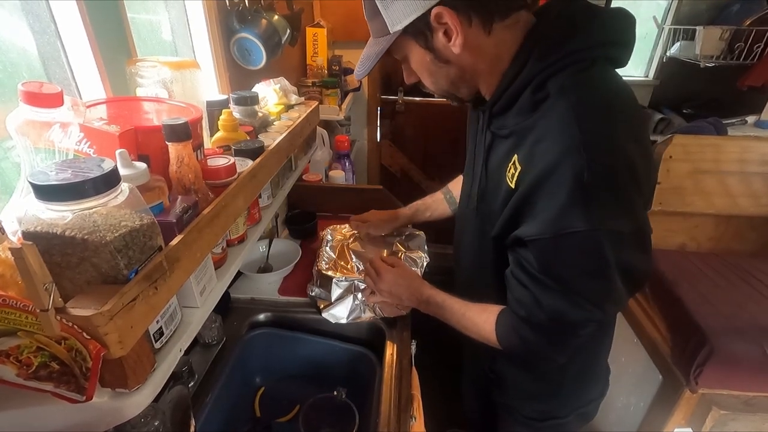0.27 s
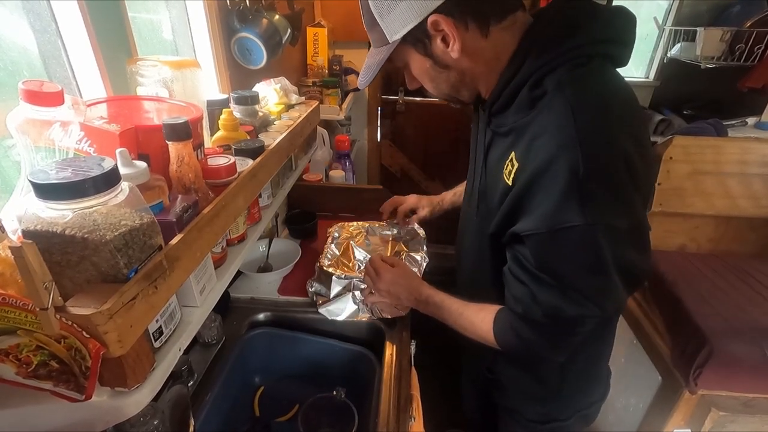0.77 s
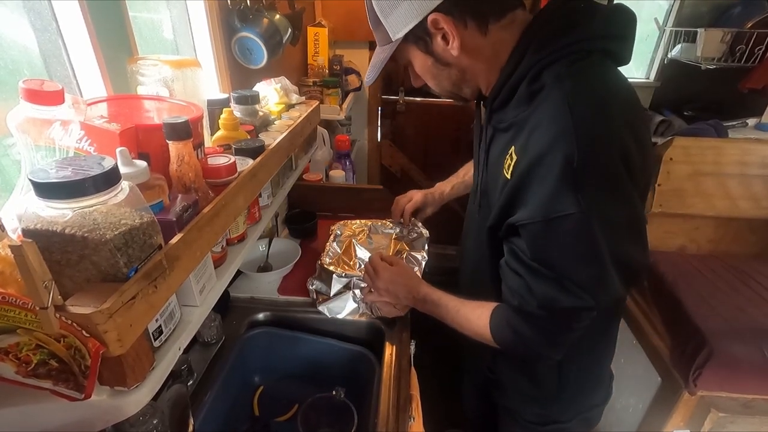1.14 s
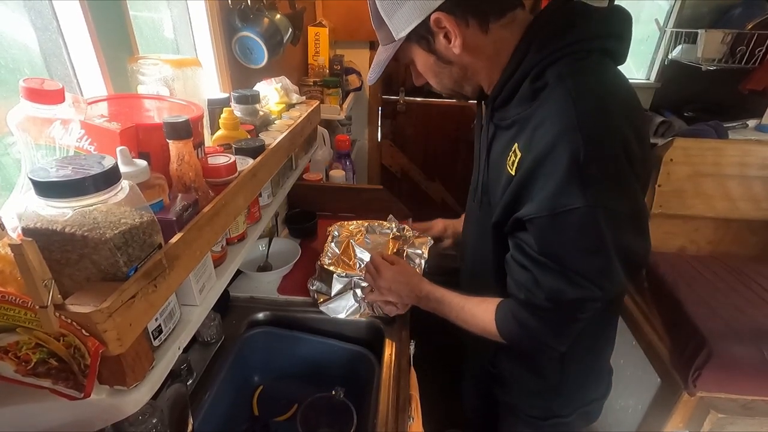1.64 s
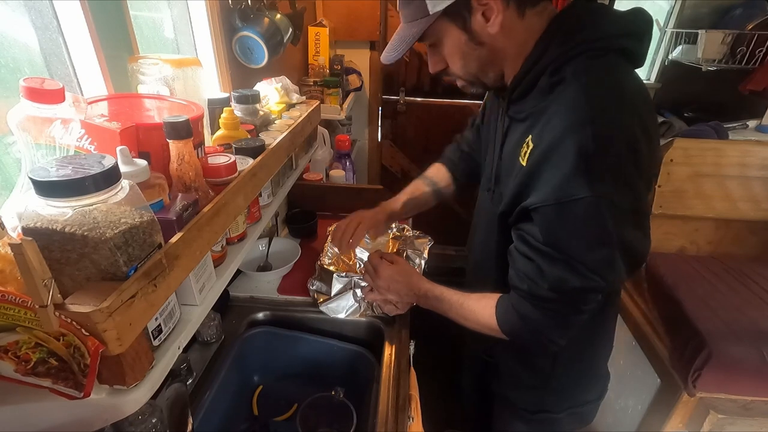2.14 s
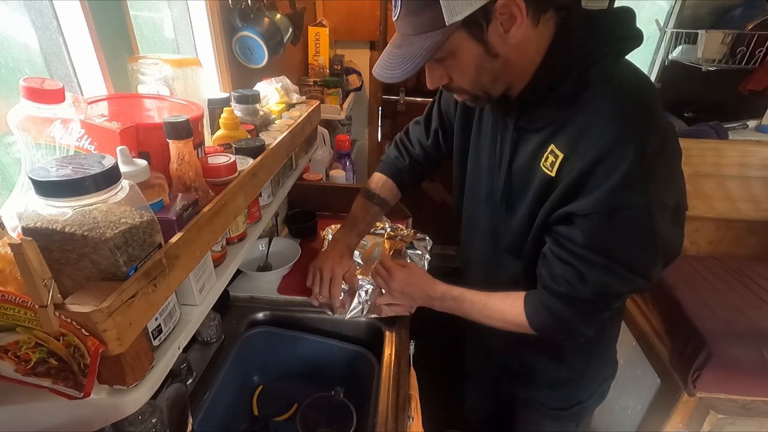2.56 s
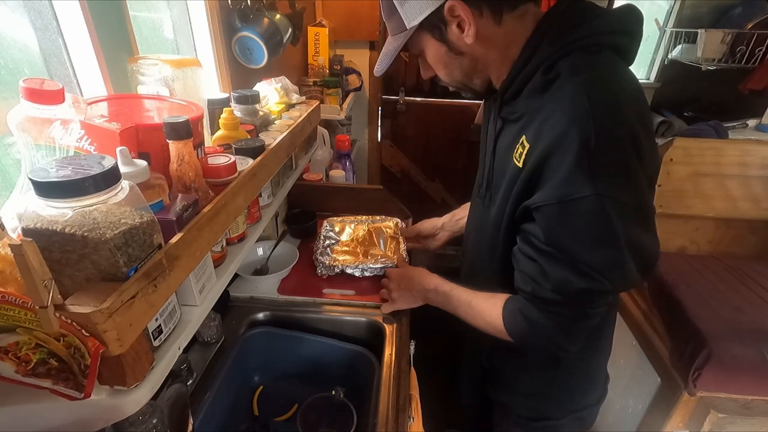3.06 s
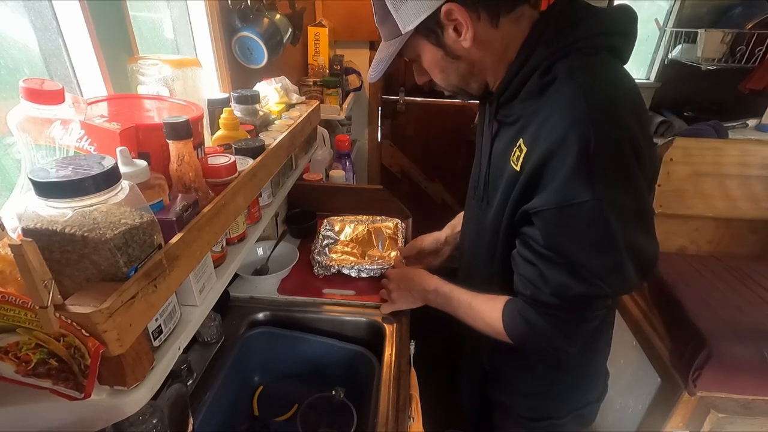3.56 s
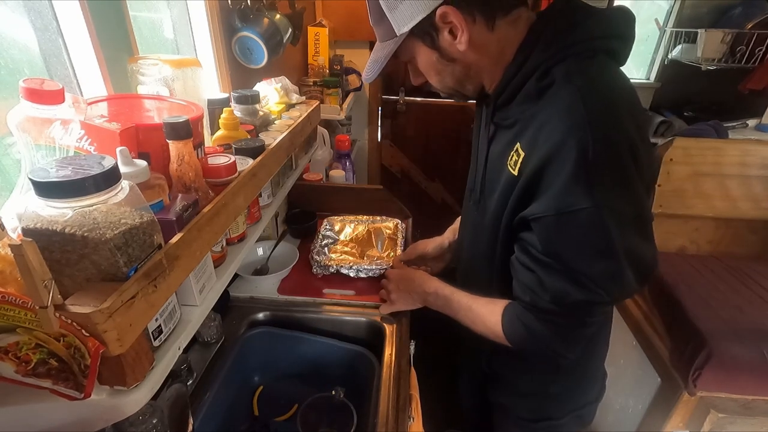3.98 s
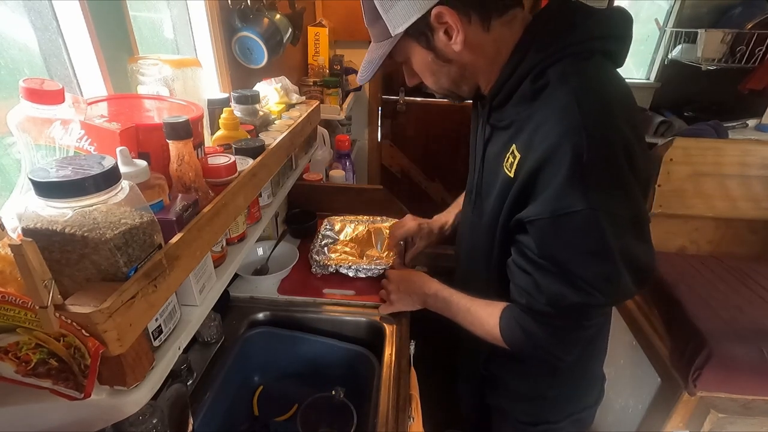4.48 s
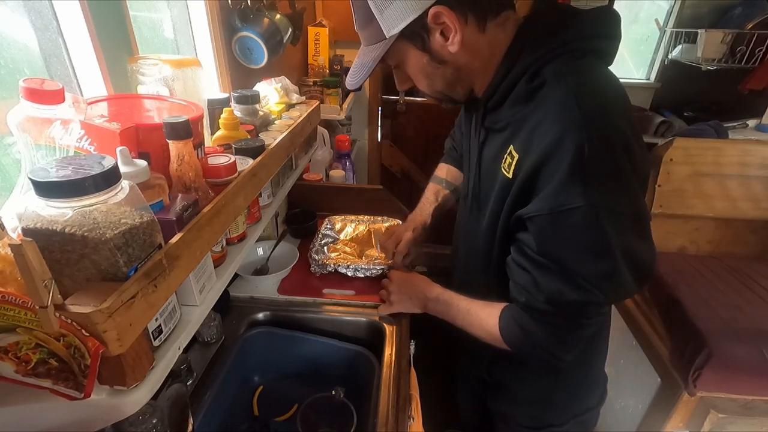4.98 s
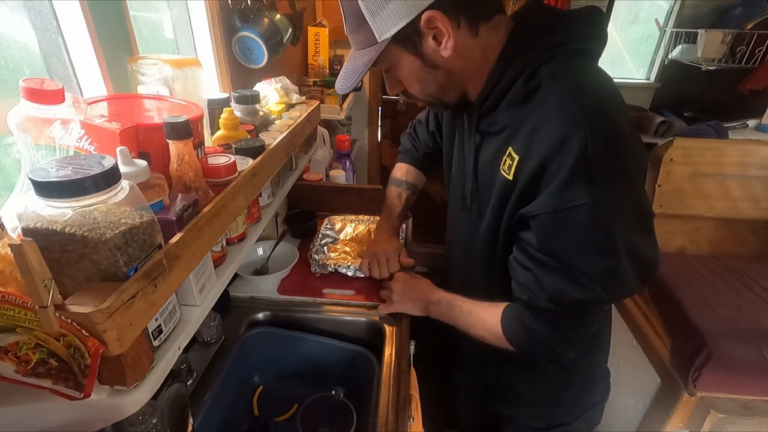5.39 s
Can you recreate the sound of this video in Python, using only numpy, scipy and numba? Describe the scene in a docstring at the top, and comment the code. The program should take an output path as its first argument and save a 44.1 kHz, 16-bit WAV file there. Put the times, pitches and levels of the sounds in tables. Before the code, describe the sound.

Hands press aluminium foil over a baking pan in a small kitchen, heard close up in stereo. Dense bright crackles and sharp snaps run for two seconds, with a dull pan knock near one second. A near-silent pause follows, then a strong burst of crumpling, thinning to delicate crinkles and isolated ticks. A short tail from close walls, faint low rumble and steady room hum sit beneath.

```python
"""Aluminium foil is pressed over a baking pan and crimped round its rim, an arm's length from the microphone.
Creases snap as damped sines, singly and in dense swarms, with a short noise-like shimmer of the sheet after them.
The pan's rim rings in a few dull modes as it knocks on the worktop, and rubbing stirs filtered noise in both.
The place is a small kitchen: close shelves and walls return a short tail, and under it all lie a low
wandering rumble and a faint steady room hum, both of filtered noise."""
import sys
import numpy as np
from scipy import signal
from scipy.fft import rfft, irfft, next_fast_len
from scipy.io import wavfile
from numba import njit

SR = 44100
rng = np.random.default_rng(int(sys.argv[2]) if len(sys.argv) > 2 else 0)


def unload_wav(signal):
    """Save mono or channel-first audio to the path in sys.argv[1] as 16-bit WAV at rate SR, clipped to [-1, 1]."""
    wavfile.write(
        sys.argv[1],
        SR,
        np.round(np.clip(np.atleast_2d(signal).T, -1, 1) * 32767).astype(np.int16),
    )


N = 248283
TIME = np.arange(N) / SR  # seconds

# a hand presses the sheet down on the pan: (start [s], length [s], crackle level [dB],
# wide panels over crackle [dB], fine creases over crackle [dB], worktop level [dB], pan level [dB])
PRESSES = [(0, 0.01, -33.5, 0.5, -2, -41.5, -40), (0.092, 0.093, -42.5, 3.5, -5, -54.5, -52.5),
           (0.239, 0.092, -41.5, 4.5, -7, -46.5, -49), (0.326, 0.074, -37, 1, -7, -46.5, -43.5),
           (0.404, 0.13, -47, 2.5, -3.5, -54.5, -55), (0.588, 0.15, -44.5, 5.5, -9, -55, -47),
           (0.691, 0.082, -33.5, -2, -7, -45.5, -39.5), (0.856, 0.09, -41, 5.5, -5, -42.5, -44),
           (0.977, 0.035, -37.5, 3, -11, -33, -30), (1.024, 0.05, -41.5, 0, -2.5, -41, -52),
           (1.1, 0.054, -54.5, 4, -11, -53, -62), (1.131, .04, -41, 0, -11, -60, -48),
           (1.22, 0.2, -56, 4, -5, -63, -58), (1.35, 0.077, -38, 3.5, -4.5, -47.5, -51),
           (1.401, 0.059, -36, 0.5, -0.5, -47, -41), (1.508, 0.11, -41.5, 1.5, -4, -46, -44.5),
           (1.608, 0.035, -39.5, 4, -3, -34, -41.5), (1.66, 0.048, -37.5, 3, -8.5, -39, -45.5),
           (1.73, 0.085, -43, 2.5, -6, -56, -52), (1.868, 0.042, -43, 6.5, -8, -45.5, -44.5),
           (1.954, 0.084, -57, 5, -7, -59, -63), (2.052, 0.035, -68.5, 13, -13, -63, -74),
           (2.13, 0.12, -67, 9, -1.5, -70, -79.5), (2.272, 0.094, -76.5, 10, 0.5, -75.5, -76),
           (2.352, 0.11, -61.5, 2, -7, -74, -75), (2.481, .05, -33, 4, -1.5, -36, -49),
           (2.524, 0.049, -32, 0, -2, -37.5, -46.5), (2.596, 0.13, -44, 8, -3.5, -43, -43),
           (2.743, 0.11, -38.5, 7, -2, -44.5, -42), (2.914, 0.11, -56, 7, -11, -67, -60.5),
           (3.02, 0.012, -66, 3, -7, -58, -58), (3.101, 0.18, -50, 0, -8, -67, -59.5),
           (3.272, 0.048, -45, 1.5, -9, -68, -58), (3.373, 0.045, -47, 5, -15, -52.5, -57.5),
           (3.522, 0.08, -54, 1.5, -5, -60, -65), (3.608, 0.087, -43.5, -0.5, -11, -72, -54.5),
           (3.731, 0.12, -56.5, 3, -4.5, -62, -69), (3.919, 0.11, -59, 3, -7, -62, -66),
           (4.025, 0.084, -58.5, 1, -12, -60, -71), (4.176, .06, -56.5, -2, -4, -66, -76),
           (4.265, 0.034, -63, -1, -6, -58, -74), (4.31, 0.05, -56, -5, -2.5, -65, -74),
           (4.37, 0.13, -47, -0.5, -5, -60.5, -65), (4.495, 0.041, -46, 5, -4.5, -58, -57.5),
           (4.598, 0.02, -56, 1.5, -2, -70, -71), (4.719, 0.057, -55.5, 8.5, -5.5, -56, -63.5),
           (4.824, 0.22, -57, 5, -8.5, -60.5, -64), (5.056, 0.077, -47, 0, -6, -54.5, -63),
           (5.156, 0.091, -60, 10, -7, -62, -60.5), (5.332, .13, -60, 4, -1, -64.5, -79),
           (5.47, .12, -50, 3.5, -8.5, -53.5, -56.5)]
# a fold gives way and the sheet shimmers: (time [s], nominal peak [dB], tint pitch [Hz],
# wide panels over creases [dB], fine creases over creases [dB], t60 [s])
FOLDS = [(0.0987, -14, 1577, -1.5, -7, 0.1), (0.1555, -30.5, 1750, 0, -12, 0.18),
         (0.2466, -21, 1740, 0, 3, 0.09), (0.2596, -22, 1800, -8.5, -8, 0.076),
         (0.2723, -19.5, 1740, -3, 8.5, 0.083), (0.3366, -19, 3000, -13, -10, 0.12),
         (0.3701, -14.5, 1030, 0, -7, 0.16), (0.4319, -26.5, 1900, 8, -12, 0.17),
         (0.4794, -18.5, 3300, -1, -5, 0.069), (0.5042, -21, 2810, -7, 1, 0.035),
         (0.574, -20.5, 1610, -1.5, -5.5, 0.19), (0.595, -31, 4640, -20, 7, 0.073),
         (0.6488, -26, 1510, 9, 6.5, 0.14), (0.6666, -23, 1115, 0, 8.5, 0.095),
         (0.7043, -34, 3060, 0, -14, 0.064), (0.835, -26.5, 927, 2, -11, 0.18),
         (0.8505, -27.5, 2680, 2, -6, 0.15), (0.8782, -14.5, 1736, -3.5, -6.5, 0.2),
         (0.8974, -15, 3280, -5, 1.5, 0.1), (0.9173, -7.5, 1050, -3, -2.5, 0.055),
         (0.9667, -13.5, 2700, 4, -6, 0.043), (0.9892, -16.5, 1036, 1, -2.5, 0.19),
         (1.0445, -22, 1050, 2, -8, 0.16), (1.1463, -16, 4330, -4, -3.5, 0.11),
         (1.217, -26, 4950, -3, -9, 0.12), (1.2475, -18.5, 4100, -2, -21, 0.12),
         (1.3259, -30.5, 1240, 2, -14, 0.16), (1.3603, -30, 1410, 9, -18, 0.063),
         (1.3663, -39, 2870, 0, -13, 0.09), (1.3954, -13.5, 1028, 5.5, 1.5, 0.26),
         (1.4825, -20.5, 1400, 5, -17, 0.27), (1.5356, -17.5, 1530, 9, -2, 0.059),
         (1.5733, -15, 1760, 1.5, 0, 0.12), (1.5958, -19, 940, 8, 3, 0.11),
         (1.6536, -13, 4680, -4, 2.5, 0.19), (1.731, -20, 4000, -11, -8, 0.09),
         (1.769, -19.5, 1760, 4.5, -3.5, 0.12), (1.7937, -12, 1820, -13, -14, 0.056),
         (1.852, -24, 4850, 3, -4, 0.078), (1.8784, -25, 2600, 10, -1, 0.09),
         (1.906, -17.5, 2960, -9, -13, 0.14), (2.1405, -54, 1010, 6, -4, 0.09),
         (2.1809, -48, 1060, 8, -1, 0.098), (2.4059, -28, 3340, -10, -10.5, 0.09),
         (2.4865, -11.5, 3490, 2.5, -6, 0.13), (2.6115, -14.5, 1110, -2, -5, 0.05),
         (2.6437, -15.5, 1035, -12, -4.5, 0.14), (2.66, -13, 3520, 9, -5, 0.068),
         (2.6763, -16, 1220, 7, -10, 0.038), (2.711, -26, 975, 6, -1, 0.16),
         (2.7511, -23, 1210, -7, 4, 0.098), (2.7836, -9, 1057, -2, -8, 0.11),
         (2.848, -17, 1045, 6, -4, 0.15), (2.9133, -23, 1280, 4, -2, 0.064),
         (2.9414, -38, 1260, 15, -10, 0.046), (2.9547, -40, 1030, 19, -13, 0.066),
         (2.9685, -32, 2940, 8, -19, 0.06), (2.9977, -22.5, 1280, -2, -13, 0.1),
         (3.0215, -23.5, 4830, -1, -7, 0.051), (3.036, -24, 3620, 11, -12, 0.03),
         (3.05, -27, 1010, 10, -24, 0.03), (3.1066, -26, 1530, 4, -11, 0.13),
         (3.1547, -23, 2970, -2, -5, 0.09), (3.1837, -19.5, 4520, -11.5, -4.5, 0.19),
         (3.224, -16, 3160, -5.5, -5, 0.067), (3.265, -25, 3170, -12, 4, 0.069),
         (3.286, -19, 5200, -23, -1, 0.083), (3.3002, -11, 2740, -10, -8, 0.065),
         (3.3887, -15.5, 4870, -17, -2.5, 0.12), (3.5132, -37.5, 3700, 4, -1, 0.077),
         (3.5547, -23, 2750, -10, -5.5, 0.09), (3.582, -24, 3450, -3, -6, 0.085),
         (3.6218, -15, 3280, -18, -8.5, 0.11), (3.6454, -18, 1380, -4, -7, 0.2),
         (3.683, -18.5, 2830, -17, 4.5, 0.058), (3.7229, -24, 2840, -4, -12, 0.11),
         (3.7643, -37, 1020, 11, -6, 0.12), (3.821, -32, 1017, 5, -1.5, 0.12),
         (3.935, -45, 2460, -16, -8, 0.09), (3.9494, -26.5, 5430, -17, -7, 0.14),
         (4.021, -24.5, 3440, -3, -7.5, 0.12), (4.0487, -31.5, 3030, 7.5, -12, 0.05),
         (4.0926, -23, 3930, -2, -6, 0.1), (4.2363, -36, 1920, 3, -1, 0.12),
         (4.38, -14.5, 3060, -10, -8, 0.061), (4.414, -24.5, 2920, 0.5, -3, 0.27),
         (4.5202, -19, 2430, 2, -0.5, 0.056), (4.6059, -31, 3620, -8, 1.5, 0.075),
         (4.715, -42.5, 1060, -1, -4, 0.098), (4.7311, -30, 2850, -9, -15, 0.08),
         (4.757, -34, 1090, 8, -9, 0.075), (4.8344, -42, 1130, 14, -13, 0.051),
         (4.9017, -27.5, 1030, 4, -3.5, 0.18), (4.9283, -21, 1140, -0.5, -21, 0.14),
         (4.9838, -20.5, 3280, -3, -14, 0.21), (5.049, -30, 4100, 4, -9, 0.073),
         (5.0719, -14.5, 2720, -5, -6, 0.19), (5.1253, -23.5, 2900, -1.5, -13, 0.2),
         (5.1784, -22.5, 1340, 3, -8, 0.055), (5.238, -34, 1780, 6, -10, 0.068),
         (5.244, -33.5, 1030, 7, -19, 0.052), (5.3397, -39.5, 1910, 11, -5, 0.064),
         (5.416, -25, 1254, 2.5, -3.5, 0.097), (5.4774, -26.5, 1057, -0.5, -10, 0.19),
         (5.5194, -19.5, 1080, -5, -8, 0.19)]
# lone creases that pop: (time [s], nominal peak [dB], pitch [Hz], crack over ring, nominal [dB])
POPS = [(.098, -20, 860, 5), (.2753, -11, 1960, 1), (.4327, -17, 1870, -10), (.4797, -22, 2730, 1),
        (.4881, -24, 1850, 2), (.5068, -21, 2800, 0), (.5987, -19, 1980, 0), (.6676, -18, 3470, 6),
        (1.3975, -13, 1010, -2), (1.5352, -18, 1590, 0), (1.7947, -16, 1790, 1), (1.8542, -28, 4820, 3),
        (1.8805, -19, 2650, -1), (1.9058, -18, 3230, -1), (2.1413, -40, 1100, -4), (2.162, -39, 1100, -3),
        (2.1817, -40, 1140, -5), (2.2022, -40, 1140, -3), (2.2251, -39, 1100, -3), (2.2522, -39, 1140, 0),
        (2.7839, -11, 1100, -6), (2.8497, -12, 1060, -8), (2.8712, -17, 1100, -4), (2.9152, -23, 1210, 1),
        (2.9411, -28, 1120, -9), (2.9554, -25, 1140, -6), (2.9698, -26, 3100, 0), (3.0244, -26, 5040, 5),
        (3.0506, -20, 1490, 8), (3.2656, -27, 6610, 4), (3.2868, -23, 5300, 4), (3.5143, -41, 1770, 2),
        (3.6837, -19, 4740, 2), (3.8225, -30, 4240, 4), (3.9372, -38, 2560, 0), (4.0239, -31, 1340, 4),
        (4.0503, -32, 2990, 6), (4.0935, -26, 5860, 5), (4.2411, -34, 3190, -1), (4.6066, -33, 6550, 5),
        (4.7164, -43, 990, 0), (4.822, -44, 1080, -1), (4.8801, -35, 4310, 5), (5.0523, -28, 5900, 3),
        (5.2401, -32, 1740, -4), (5.3384, -37, 1080, -1), (5.3498, -35, 1960, -1), (5.4183, -26, 1310, -1)]
# colour of the foil: (frequency [Hz], relative level [dB])
FOIL = [(290, -70), (500, -30.5), (748, -18), (997, 1), (1270, -1.5), (1450, -2.5), (2330, 7), (3380, 16.5),
        (4770, 12.5), (7340, 3.5), (8240, -1), (12000, -7.5), (15500, -27)]
# the pan knocks on the worktop: (time [s], blow level [dB])
KNOCKS = [(.9876, -7), (1.045, -30), (1.598, -24), (1.885, -34)]
# modes of the pan's rim: (frequency [Hz], relative level [dB], t60 [s])
RIM = [(1120, -8, .03), (850, 0, .04), (620, -12, .04), (431, -9, .07), (312, -15, .09), (161, -14, .14),
       (92, -16, .2)]
# broad resonances of the pan: (frequency [Hz], relative level [dB])
PAN = [(180, -26.5), (260, -5.5), (320, 2.5), (350, 0.5), (430, 1.5), (540, 1), (620, 3.5), (800, 4.5),
       (1200, -44.5)]
# broad resonances of the worktop: (frequency [Hz], relative level [dB])
WORKTOP = [(40, -9), (70, -4), (92, 1), (125, -3.5), (163, 3.5), (200, -5.5), (260, -10), (400, -52.5)]
# colour of what shelves and walls send back: (frequency [Hz], gain [dB])
WALLS = [(200, -14), (1000, -5), (3000, 0), (8000, 0), (13000, 7)]
# course of the low rumble: (time [s], level [dB])
RUMBLE = [(0.0, -47.5), (0.45, -53), (0.55, -57), (0.99, -55), (1.03, -28), (1.19, -54), (1.77, -50.5),
          (2.45, -66), (2.6, -39), (2.63, -59), (2.87, -42), (3.15, -63), (3.21, -36), (3.36, -63),
          (3.43, -47), (4.61, -62.5), (4.78, -40), (5.2, -61.5), (5.55, -51), (5.63, -66)]
# colour of the room hum: (frequency [Hz], relative level [dB])
ROOM = [(45, -2), (62, -45), (120, -18), (160, 6.5), (230, -4.5), (400, -7.5), (700, -32), (1500, -13.5),
        (6000, -22.5), (14000, -63)]
# phase between the microphone's two ports: (frequency [Hz], lead of the left port [rad])
PORT_LEAD = [(0, 0), (520, -.4), (1290, -.4), (3100, -.6), (4910, -.4), (7240, -.3), (10900, -.2),
             (15200, .1)]

PRESS_ATTACK_S = 0.012
SHEET_RELEASE_DB_S, BODY_RELEASE_DB_S = 345.5, 259  # fall after a press, dB per second
CONTACT_PAN_DB, FOLD_PAN_DB, POP_PAN_DB = 0.61, 2, 0.2  # left minus right
FOLD_CREST_DB = 17.5  # peak over rms
SCATTER_DB, BIGGEST_DB = 2.5, 9  # mean of the random boost to a buckle, and its ceiling
WALLS_T60_S, WALLS_DB = 0.1, -5.5
ROOM_DB = -60.5
TOP_HZ = 15650
OPPOSITE = np.array([[1], [-1]])  # signs of a side signal at left and right


def undb(db):
    """Amplitude factor of a level in dB."""
    return 10 ** (np.asarray(db) / 20)


def unit(x):
    """Scale to an rms of 1."""
    return x / np.sqrt(np.mean(x ** 2))


def sides(pan_db):
    """Left and right gains whose levels differ by pan_db."""
    return undb(np.array([[pan_db], [-pan_db]]) / 2)


def colour(x, points):
    """Zero-phase filter through (frequency [Hz], gain [dB]) points, on a log frequency axis."""
    hz, db = np.transpose(points)
    size = next_fast_len(N + 8192)
    f = np.maximum(np.arange(size // 2 + 1) * SR / size, 1)
    gain = undb(np.interp(np.log(f), np.log(hz), db))
    return irfft(rfft(x, size) * gain, size)[..., :N]


def crackle():
    """The swarm of buckling creases follows the presses of the hands."""
    db, panel_db, fine_db = np.transpose(PRESSES)[2:5]
    parts = swarm(per_s=3000, cycles=1.54, shimmer_db=1.0, shimmer_t60=0.06)
    return sum(pressing(db + extra, SHEET_RELEASE_DB_S) * part
               for extra, part in zip((panel_db, 0, fine_db), parts))


def folds(tint_db=-6, tint_hz=400):
    """A run of buckles, strongest near the pitch of the fold, flares up and dies away."""
    run = swarm(per_s=5000, cycles=4.4, shimmer_db=1.0, shimmer_t60=0.075)
    # slow noise spreads the tint tint_hz to either side of its pitch
    low_pass = signal.butter(2, tint_hz, fs=SR, output="sos")
    waver = unit(signal.sosfilt(low_pass, rng.standard_normal(N)))
    out = np.zeros((2, N))
    for s, db, hz, panel_db, fine_db, t60 in FOLDS:
        i = int(s * SR)
        t = TIME[:min(SR // 3, N - i)]
        span = slice(i, i + len(t))
        broad = undb([panel_db, 0, fine_db]) @ run[:, span]
        tint = undb(tint_db) * waver[span] * np.sin(2 * np.pi * hz * t)
        rise = 1 - np.exp(-t / .001)
        shape = rise * undb(db - FOLD_CREST_DB - 60 * t / max(t60, .01))
        out[:, span] += sides(FOLD_PAN_DB) * shape * (broad + tint)
    return out


def pops(ring_t60=.014, crack_t60=.012, rise_s=.0002):
    """A facet flips over: a few cycles at its own pitch and a broad crack, sharing the peak."""
    hiss = unit(colour(rng.standard_normal(N), FOIL))
    out, t = np.zeros((2, N)), TIME[:SR // 30]
    rise = 1 - np.exp(-t / rise_s)
    for s, db, hz, crack_db in POPS:
        i, crack = int(s * SR), undb(crack_db)
        span = slice(i, i + len(t))
        ring = 1.2 * undb(-60 * t / ring_t60) * np.sin(2 * np.pi * hz * t)
        # a weak crack on a wide, low facet is also a dull one
        dull = signal.butter(2, min(4 * hz * crack, 15000), fs=SR, output="sos")
        burst = .7 * crack * undb(-60 * t / crack_t60) * signal.sosfilt(dull, hiss[span])
        snap = rise * (ring + burst) / np.hypot(1, crack)
        out[:, span] += sides(POP_PAN_DB) * undb(db) * snap
    return out


def swarm(per_s, cycles, shimmer_db, shimmer_t60):
    """Tiny sharp buckles, each with its own pitch and ring, some bigger than the rest; the sheet shimmers on."""
    when, pitch, big, ring = rng.random((int(8000 * N / SR), 4)).T
    on = np.arange(len(when)) < per_s * N / SR  # keeps per_s buckles a second
    hz = 700 * 20 ** pitch
    t60 = cycles * 3 ** ring / hz
    boost_db = np.minimum(-SCATTER_DB * np.log(1 - big), BIGGEST_DB)
    size = on * undb(boost_db) * hz
    buckles = unit(rings((when * N).astype(np.int64), hz, t60, size, N))
    shimmer = tails(buckles, shimmer_t60, channels=1)[0]
    sound = buckles + undb(shimmer_db) * shimmer
    return np.array(bands(colour(sound, FOIL)))


@njit
def rings(start, hz, t60, size, count):
    """Damped sines: one for each (sample, pitch, decay, size)."""
    out = np.zeros(count)
    for k in range(len(start)):
        # one sample's turn and decay of a spinning phasor
        step = np.exp(2j * np.pi * hz[k] / SR - np.log(1000) / (t60[k] * SR))
        z = size[k] + 0j
        for i in range(start[k], min(count, start[k] + int(t60[k] * SR))):
            z *= step
            out[i] += z.imag
    return out


def bands(x, low_hz=1550, high_hz=6800):
    """Wide-panel, crease and fine-crease parts of a sound, low to high, each of rms 1."""
    edges = [(low_hz, "low"), ([low_hz, high_hz], "band"), (high_hz, "high")]
    filters = [signal.butter(4, hz, kind, fs=SR, output="sos") for hz, kind in edges]
    return [unit(signal.sosfilt(sos, x)) for sos in filters]


def pressing(db, release_db_s):
    """Every press rises, holds for its length and lets go; the powers of the presses add."""
    power = 0
    for (s, length, *_), top in zip(PRESSES, db):
        t = TIME - s
        rise = np.clip(t / PRESS_ATTACK_S, 0, 1)
        fall = undb(top - release_db_s * np.maximum(t - length, 0))
        power = power + (rise * fall) ** 2
    return np.sqrt(power)


def knocks(contact_s=.0008):
    """Each blow rings the short, dull modes of the pan's rim; the low ones stay longest."""
    out, t = np.zeros(N + SR), TIME[:SR // 3]
    hz, mode_db, t60 = np.transpose(RIM)[:, :, None]
    modes = undb(mode_db - 60 * t / t60) * np.sin(2 * np.pi * hz * t)
    ring = (1 - np.exp(-t / contact_s)) * np.sum(modes, axis=0)
    for s, db in KNOCKS:
        i = int(s * SR)
        out[i:i + len(t)] += undb(db) * ring
    return out[:N]


def scuff(apart=0.22):
    """Rough rubbing contact shakes the worktop and the pan in their broad resonances."""
    out = 0
    for db, body in zip(np.transpose(PRESSES)[5:], (WORKTOP, PAN)):
        mid, side = unit(colour(rng.standard_normal((2, N)), body))
        out = out + pressing(db, BODY_RELEASE_DB_S) * (mid + apart * side * OPPOSITE)
    return out


def walls(direct):
    """Close shelves and walls send back a short tail, different at each side and thin in the bass."""
    return undb(WALLS_DB) * colour(tails(direct, WALLS_T60_S, channels=2), WALLS)


def tails(x, t60, channels, hop=768, size=8192):
    """Dense noise decays, a fresh one for each short stretch: each moment comes from another spot of the sheet."""
    t = TIME[:size - 2 * hop]
    decay = undb(-60 * t / t60)
    padded = np.pad(np.atleast_2d(x), ((0, 0), (hop, 2 * hop)))
    stretches = np.lib.stride_tricks.sliding_window_view(padded, 2 * hop, axis=1)[:, ::hop]
    parts = stretches * np.hanning(2 * hop)  # overlapping by half
    noise = rng.standard_normal((channels, parts.shape[1], len(t)))
    echo = noise * decay / np.sqrt(np.sum(decay ** 2))
    wet = irfft(rfft(parts, size) * rfft(echo, size), size)
    out = np.zeros((channels, N + 2 * size))
    for k in range(parts.shape[1]):
        out[:, k * hop:k * hop + size] += wet[:, k]
    return out[:, hop:hop + N]


def rumble():
    """Narrow noise at the bottom of hearing, its level wandering."""
    s, db = np.transpose(RUMBLE)
    points = [(10, -19.5), (21, 24.5), (36, 6.5), (55, -40), (70, -72)]
    low, side = colour(rng.standard_normal((2, N)), points)
    low, side = unit(low), unit(side)
    # dividing by the envelope evens the strength while the pitch wanders
    envelope = np.abs(signal.hilbert(low, next_fast_len(N))[:N])
    even = unit(low / (envelope + .3))
    return undb(np.interp(TIME, s, db)) * unit(even + .12 * side * OPPOSITE)


def room_hum():
    """Steady coloured noise of the room, a little different at each side."""
    mid, side = colour(rng.standard_normal((2, N)), ROOM)
    return undb(ROOM_DB) * unit(mid + .4 * side * OPPOSITE)


def scene():
    """Foil and pan close by, their return from the walls, and the background."""
    contact = sides(CONTACT_PAN_DB) * (crackle() + knocks() + scuff())
    direct = contact + folds() + pops()
    return direct + walls(direct) + rumble() + room_hum()


def record(dry):
    """The microphone's two ports differ a little in phase; the top is cut."""
    hz, lead = np.transpose(PORT_LEAD)
    size = next_fast_len(N + 8192)
    turn = np.exp(1j * np.interp(np.arange(size // 2 + 1) * SR / size, hz, lead))
    left = irfft(rfft(dry[0], size) * turn, size)[:N]
    ports = np.array([left, dry[1]])
    return signal.sosfilt(signal.ellip(12, 1, 60, TOP_HZ, fs=SR, output="sos"), ports)


dry = scene()
out = record(dry)
unload_wav(out)
```